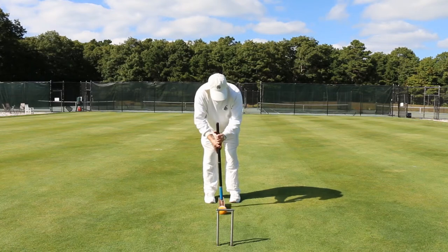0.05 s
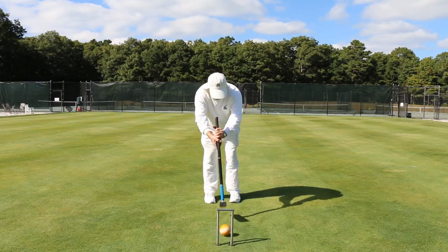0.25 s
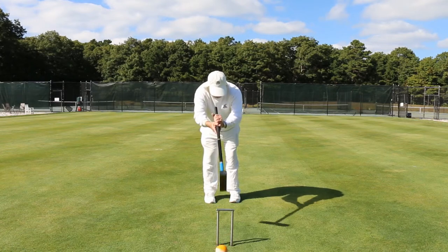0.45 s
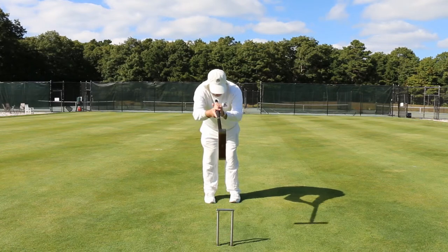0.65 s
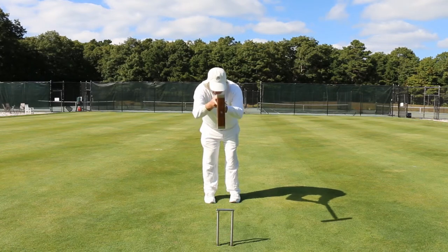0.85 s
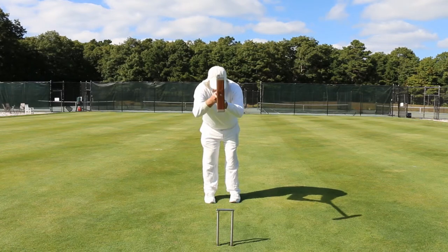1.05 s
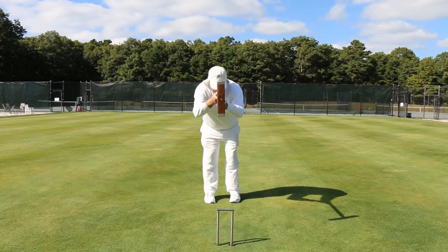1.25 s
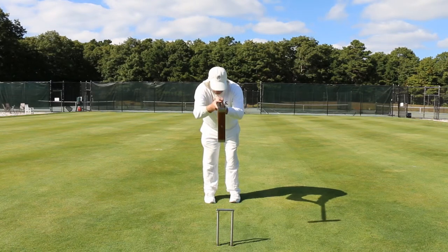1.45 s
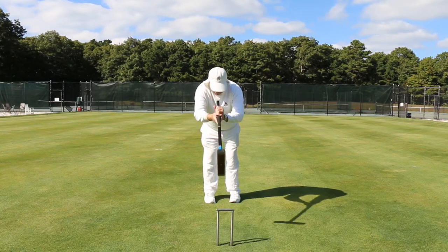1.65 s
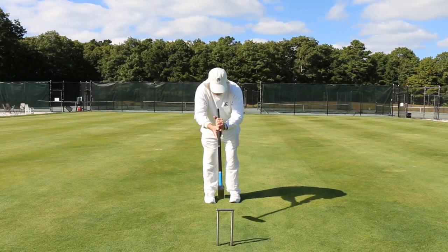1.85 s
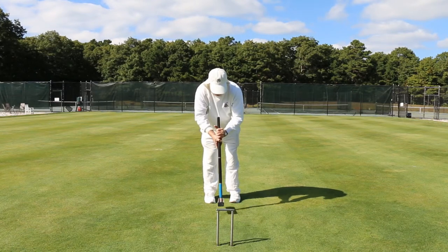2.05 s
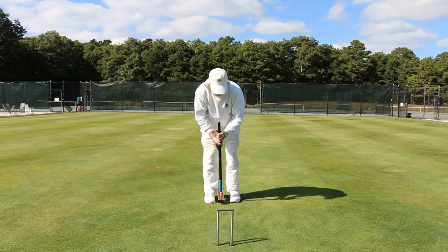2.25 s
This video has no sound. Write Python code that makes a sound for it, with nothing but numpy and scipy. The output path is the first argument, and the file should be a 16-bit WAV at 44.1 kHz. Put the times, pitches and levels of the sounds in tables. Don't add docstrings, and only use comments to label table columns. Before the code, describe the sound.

Outdoors, the end of a thin bird whistle precedes one sharp woody crack near the microphones, overloading them; afterwards a low, steady airy wash continues with faint chirps from trees to the right.

```python
import sys
import numpy as np
from scipy import signal
from scipy.fft import rfft, irfft
from scipy.io import wavfile
from scipy.ndimage import uniform_filter1d

SR = 44100
rng = np.random.default_rng(int(sys.argv[2]) if len(sys.argv) > 2 else 0)


def makeup_ratio(level_db):
    decades = np.asarray(level_db, float) / 20
    return 10 ** decades


def bounce(signal):
    frames = np.transpose(np.atleast_2d(signal))
    limited = np.clip(frames, -1, 1)
    pcm = np.round(limited * 32767).astype(np.int16)
    wavfile.write(sys.argv[1], SR, pcm)


N = 101429

# (frequency [Hz], level [dB per Hz])
WASH_COLOUR = [(15, -30), (30, -6.5), (120, -2.5), (500, -6), (1500, -7.5), (6000, -13), (11000, -16.5),
               (16000, -20)]
# (frequency [Hz], width [Hz], level over the wash [dB], left minus right [dB])
DRONES = [
    (196.6, 18.5, 5.5, 1),
    (395, 30, 5, -3),
    (675, 110, 6.5, -1.5),
    (873, 64, 4.5, 2.5),
    (1096, 38, 4.5, -0.5),
    (1150, 17, 1, -12.5),
]
# (frequency [Hz], correlation [-1 to 1])
LIKENESS = [(30, .92), (60, .96), (120, .92), (500, .76), (1000, .25), (1500, .35), (4000, .1),
            (15000, .12)]
# (time [s], level [dB])
WHISTLE_LEVEL = [
    (0, -56),
    (.01, -60),
    (.024, -49),
    (.07, -54),
    (.1, -46),
    (.134, -48),
    (.144, -60),
    (.178, -57),
    (.19, -66),
]
# (frequency [Hz], t60 [s], left [dB], right [dB], face pushing +1 or pulling -1)
BLOW_MODES = [(153, .0049, -6.3, -4.9, 1), (403, .003, -20, 16.3, 1), (551, .0087, 5.1, 15.4, -1),
              (654, .0188, -7.4, .2, -1), (909, .0181, -.4, 5.6, 1), (998, .0179, .6, 5.6, 1),
              (1117, .0061, 21.4, 24.2, 1), (1569, .012, 10.3, 11.3, -1), (1712, .0125, 5.9, 7, -1),
              (2014, .0094, 8.3, 6.1, -1), (2564, .0085, -10.1, -.1, -1), (3381, .0182, 4.6, 8.2, -1),
              (3376, .0126, 7.6, 12.2, 1), (4545, .0043, 5.7, 13.9, 1)]
# (frequency [Hz], t60 [s], level [dB])
SHAFT_MODES = [
    (3401, .065, -26),
    (130, .06, -32),
]
# (frequency [Hz], level [dB])
TURF_COLOUR = [(60, 6), (300, -6), (1000, -8), (3000, -16), (8000, -16), (16000, -34)]
# (middle time [s], length [s], level [dB], pitch [Hz], slide [Hz])
CHIP_NOTES = [(.972, .016, -39, 2000, -120), (1.086, .021, -37.5, 2060, -60), (1.099, .009, -41, 2080, 0),
              (1.19, .02, -50, 1800, -80), (1.182, .015, -51, 2150, 0), (1.298, .025, -45, 2080, -200),
              (1.396, .014, -45, 1920, -150), (1.397, .014, -48, 2250, 100), (1.493, .016, -48, 2290, 0),
              (1.514, .016, -51, 1850, -150), (1.592, .03, -49, 2050, -100), (1.666, .014, -49, 2020, 50),
              (1.68, .026, -43, 2300, 0), (1.756, .02, -45, 1920, 0), (1.3, .03, -50, 2250, 100),
              (1.585, .02, -51, 2280, 0)]

WASH_DB, WASH_PAN_DB, PATCH_DB, SWELL_DB = -41, -.2, .6, .3
WHINE_HZ, WHINE_DB, FLIPS_PER_S, FIRST_FLIP_S = 7867.13, -50, 29.97, .027
WHISTLE_HZ, WHISTLE_PAN_DB = 3592, -6
BLOW_S, CONTACT_S, SHAFT_WAKE_S = .203474, .00034, .003
TURF_DB, TURF_T60_S = -33, .03
ECHO_S, ECHO_DB, ECHO_HZ = .0128, -33, 1500
CHIP_PAN_DB, CHIP_LAG_S, CHIP_ROUGH = -4, .00007, .15
CHIP_ECHO_DB, CHIP_ECHO_T60_S = -12, .2
CHATTER_S, CHATTER_SPAN_S, CHATTER_DB = 1.65, .2, -52
CHATTER_HZ, CHATTER_WIDTH_HZ = 1900, 500
CEILING, KNEE = .99, 8
EDGE_HZ, SOFTEN = 15700, .19


def evened(x):
    return x / np.sqrt(np.mean(x ** 2) + 1e-20)


def read(points, hz):
    f, value = np.transpose(points)
    return np.interp(np.log(hz + 1), np.log(f + 1), value)


def panned(x, pan_db):
    return x * makeup_ratio(np.array([[pan_db / 2], [-pan_db / 2]]))


def decay(t, t60):
    return np.minimum(60 * t / t60, 200)


def wash():
    frames, hz = N // 256 + 5, np.fft.rfftfreq(1024, 1 / SR)
    a, b, c, d, patches = rng.standard_normal((frames, 513, 5)).T
    patches = uniform_filter1d(patches, size=10, axis=0)
    patches = evened(uniform_filter1d(patches, size=12, axis=1))
    swell = evened(uniform_filter1d(rng.standard_normal(frames), size=40))
    colour_db, lean_db = read(WASH_COLOUR, hz), np.zeros(len(hz))
    for centre_hz, width_hz, db, pan_db in DRONES:
        hump = np.exp(-((hz - centre_hz) / width_hz) ** 2)
        colour_db = colour_db + db * hump
        lean_db = lean_db + pan_db * hump
    same = np.clip(read(LIKENESS, hz), -1, 1)[:, None]
    left = a + 1j * b
    right = same * left + np.sqrt(1 - same ** 2) * (c + 1j * d)
    z = np.array([left, right])
    z *= makeup_ratio(np.array([lean_db, -lean_db])[:, :, None] / 2)
    z *= makeup_ratio(colour_db[:, None] + PATCH_DB * patches + SWELL_DB * swell)
    air = signal.istft(z, nperseg=1024, noverlap=768)[1][:, :N]
    return panned(makeup_ratio(WASH_DB) * evened(air), WASH_PAN_DB)


def whine():
    t = np.arange(N) / SR
    flip = np.sign(np.sin(np.pi * FLIPS_PER_S * (t - FIRST_FLIP_S)))
    tone = np.sqrt(2) * makeup_ratio(WHINE_DB) * flip * np.sin(2 * np.pi * WHINE_HZ * t)
    return panned(tone, .8)


def whistle():
    t = np.arange(N) / SR
    s, db = np.transpose(WHISTLE_LEVEL)
    level = makeup_ratio(np.interp(t, s, db, right=-120))
    return panned(np.sqrt(2) * level * np.sin(2 * np.pi * WHISTLE_HZ * t), WHISTLE_PAN_DB)


def blow():
    t = np.maximum(np.arange(N) / SR - BLOW_S, 0)
    knock = np.zeros((2, N))
    for hz, t60, left_db, right_db, face in BLOW_MODES:
        level = makeup_ratio(np.array([[left_db], [right_db]]) - decay(t, t60))
        knock += face * level * np.sin(2 * np.pi * hz * t)
    knock *= 1 - np.exp(-(t / CONTACT_S) ** 2)
    late = 1 - np.exp(-(t / SHAFT_WAKE_S) ** 2)
    shaft = np.zeros(N)
    for hz, t60, db in SHAFT_MODES:
        shaft += makeup_ratio(db - decay(t, t60)) * np.sin(2 * np.pi * hz * t)
    near, side = rng.standard_normal((2, N))
    noise = np.array([near + 0.46 * side, near - 0.35 * side])
    colour = makeup_ratio(read(TURF_COLOUR, np.fft.rfftfreq(N, 1 / SR)))
    turf = evened(irfft(rfft(noise) * colour, N)) * makeup_ratio(TURF_DB - decay(t, TURF_T60_S))
    return knock + late * (panned(-shaft, -2.6) + turf)


def slap(x):
    dull = signal.lfilter(*signal.butter(2, ECHO_HZ, fs=SR), np.tanh(x / 2))
    return makeup_ratio(ECHO_DB) * np.roll(dull, round(ECHO_S * SR), axis=1)


def chips():
    t = np.arange(N) / SR - np.array([[CHIP_LAG_S], [0]])
    notes = np.zeros((2, N))
    hoarse = 1 + CHIP_ROUGH * evened(uniform_filter1d(rng.standard_normal(N), size=150))
    for middle, length, db, hz, slide_hz in CHIP_NOTES:
        u = np.clip((t - middle) / length, -.5, .5)
        envelope = np.sqrt(abs(np.cos(np.pi * u))) * (abs(u) < .5)
        cycles = length * (hz * u + slide_hz * u ** 2 / 2)
        notes += np.sqrt(2) * makeup_ratio(db) * envelope * np.sin(2 * np.pi * cycles)
    fade = makeup_ratio(-60 * np.arange(SR // 2) / SR / CHIP_ECHO_T60_S)
    trees = rng.standard_normal((2, SR // 2)) * fade
    wet = signal.fftconvolve(notes, trees / np.linalg.norm(trees[0]), axes=1)[:, :N]
    return panned(notes * hoarse, CHIP_PAN_DB) + makeup_ratio(CHIP_ECHO_DB) * wet


def chatter():
    t, hz = np.arange(N) / SR, np.fft.rfftfreq(N, 1 / SR)
    band = np.exp(-((hz - CHATTER_HZ) / CHATTER_WIDTH_HZ) ** 2)
    blur = irfft(rfft(rng.standard_normal((2, N))) * band, N)
    throb = np.clip(1 + 0.38 * evened(uniform_filter1d(rng.standard_normal(N), size=600)), 0, None)
    rise_and_fall = np.exp(-((t - CHATTER_S) / CHATTER_SPAN_S) ** 2)
    return makeup_ratio(CHATTER_DB) * evened(blur) * throb * rise_and_fall


def scene():
    background = wash() + whine() + whistle()
    knock = blow()
    return background + knock + slap(knock) + chips() + chatter()


def roll_off(x):
    return signal.sosfilt(signal.butter(12, 16160, fs=SR, output="sos"), x)


def record(dry):
    clipped = CEILING * dry / (1 + abs(dry) ** KNEE) ** (1 / KNEE)
    taps = np.convolve(signal.firwin(255, EDGE_HZ, fs=SR), [SOFTEN, 1 - 2 * SOFTEN, SOFTEN])
    mix = signal.oaconvolve(clipped, taps[None], "same")
    return roll_off(mix)


dry = scene()
out = record(dry)
bounce(out)
```